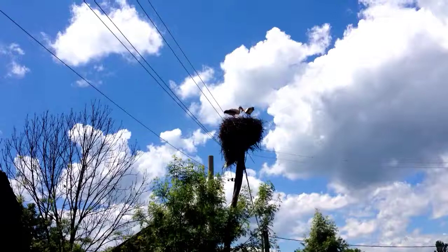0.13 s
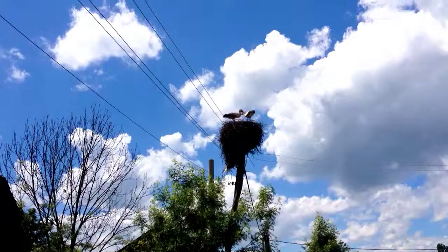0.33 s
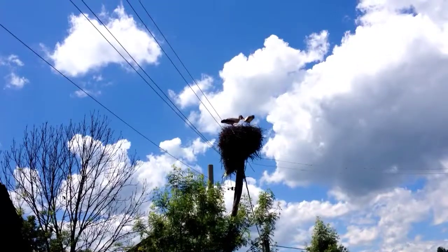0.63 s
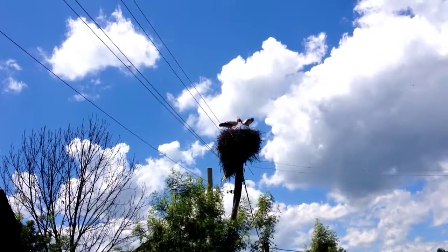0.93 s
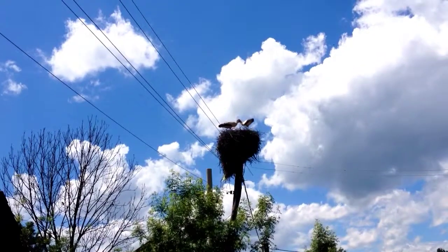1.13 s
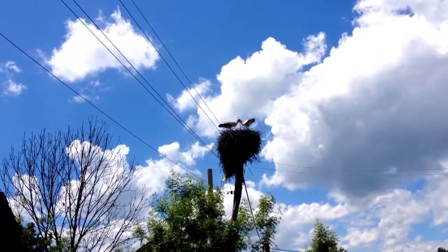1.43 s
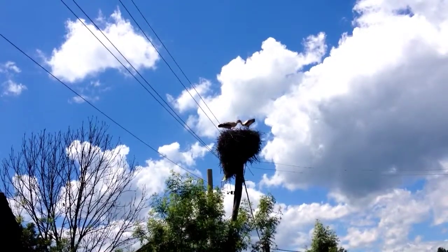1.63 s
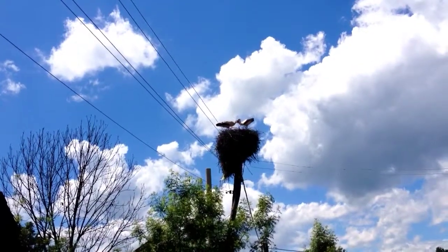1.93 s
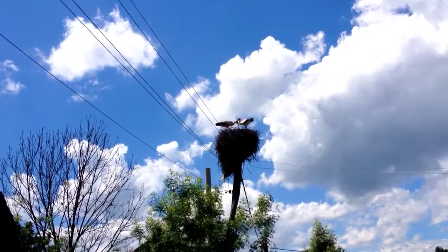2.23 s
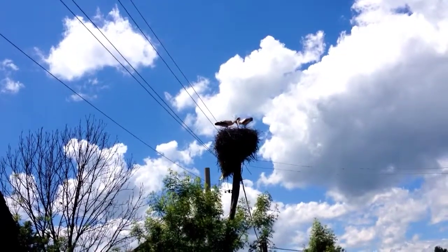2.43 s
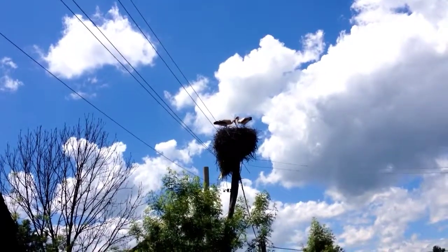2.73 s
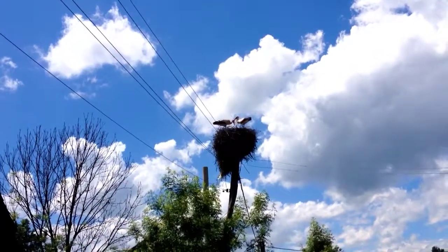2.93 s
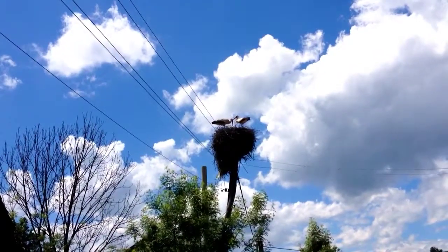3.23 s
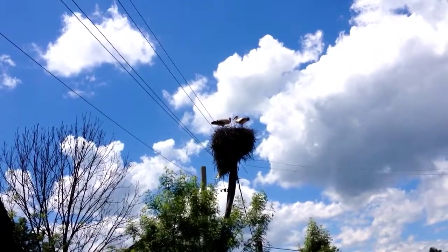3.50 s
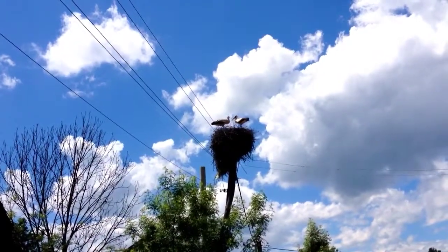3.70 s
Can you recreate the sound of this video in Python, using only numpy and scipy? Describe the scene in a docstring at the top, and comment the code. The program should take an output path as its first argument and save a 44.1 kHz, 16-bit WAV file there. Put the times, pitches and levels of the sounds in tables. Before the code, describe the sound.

Dry, rapid bill clattering from a stork echoes slightly around a yard, then dies away. Small birds keep chirping and whistling faintly in the trees, with a soft steady rush of outdoor air behind them.

```python
"""A stork on its nest is already clattering its bill: a clack's echo opens the sound, over a soft outdoor
rush with sparrows chirping and small birds whistling in the trees. Dry clacks follow from 0.24 s, about
nine a second, with light ticks between the first few. Each is a double impact that excites the modes of
bill and throat pouch. A soft low bump passes at 1.3 s. The roll fades out by 2.5 s, leaving the small
birds and the rush. Stork and small birds reverberate in the yard throughout."""
import sys
import numpy as np
from scipy import signal
from scipy.fft import rfft, irfft, next_fast_len
from scipy.io import wavfile

SR = 44100
rng = np.random.default_rng(int(sys.argv[2]) if len(sys.argv) > 2 else 0)


def inscribe(sig):
    """Save sig as 16-bit PCM at rate SR to the path in sys.argv[1].

    A 1-D sig is mono; a 2-D sig holds one channel per row.
    Samples are clipped to [-1, 1] before scaling.
    """
    pcm = np.round(np.clip(np.atleast_2d(sig).T, -1, 1) * 32767)
    wavfile.write(sys.argv[1], SR, pcm.astype(np.int16))


N = 170226

# Spectrum of the outdoor rush. Each row: frequency in Hz, relative level in dB.
RUSH_SPECTRUM = [(20, -44), (42, -37), (65, -19.5), (100, -8), (180, -4.5), (290, 2), (480, -2),
                 (800, -4.5), (1200, -12.5), (2200, -17), (4500, -17), (5400, -22.5), (7500, -24),
                 (9500, -33), (12000, -29), (15000, -24.5)]
# Loudness contour of the far sparrows. Each row: time in seconds, relative level in dB.
CHATTER_CONTOUR = [(.12, -51), (.3, -52.5), (.45, -53), (.72, -65), (.98, -74), (1.07, -48), (1.22, -81),
                   (1.34, -50), (1.68, -54), (1.9, -60.5), (2.01, -45.5), (2.24, -60.5), (2.35, -52),
                   (2.43, -57.5), (2.5, -79), (2.59, -56), (2.8, -66), (3.17, -54), (3.38, -72),
                   (3.86, -64)]
# Spectra of the far sparrows and of the bump. Each row: frequency in Hz, relative level in dB.
CHATTER_SPECTRUM = [(1800, -38), (2600, -8), (3300, -1), (4700, 6), (5200, -13.5), (7000, -23), (9500, -31)]
BUMP_SPECTRUM = [(40, -25), (100, -3), (190, 0), (330, -22), (800, -2), (1200, -22), (2000, -14),
                 (5000, -22), (12000, -45)]
# Reverberation time of the yard. Each row: frequency in Hz, time to fall 60 dB (T60) in seconds.
YARD_DECAY = [(300, .5), (2000, 0.71), (4500, 0.32), (9000, 0.7)]
# Colour of the reverberation. Each row: frequency in Hz, relative level in dB.
YARD_SPECTRUM = [(300, 5.5), (800, -2.5), (2000, -4.5), (4000, -1), (8000, -0.5), (14000, 1)]
# Sparrow chirps and thin whistles. Each row: start and length in seconds, first, middle and last
# pitch in Hz, relative level in dB.
CHIRP_NOTES = [(.17, 0.043, 6900, 6300, 6070, -60), (.725, .035, 4100, 4000, 3930, -60),
               (1.025, .03, 3740, 4400, 4550, -60), (1.04, .04, 4000, 3700, 3370, -54),
               (1.31, 0.038, 3970, 4470, 5060, -54), (1.345, 0.026, 4180, 4530, 4800, -59),
               (1.515, .03, 4230, 4450, 4650, -66), (1.63, 0.057, 4900, 5240, 4940, -59),
               (1.798, 0.036, 3790, 4300, 4440, -53.5), (1.97, 0.033, 4000, 4790, 4420, -53.5),
               (1.99, 0.063, 4200, 3650, 3110, -56), (2.075, 0.051, 4700, 4600, 4430, -54),
               (2.315, 0.042, 3930, 4510, 4700, -54.5), (2.315, 0.021, 6280, 6730, 7000, -64),
               (2.355, 0.031, 3075, 3350, 3670, -55.5), (2.68, 0.044, 3980, 3550, 3280, -64),
               (2.925, 0.033, 3690, 4450, 4950, -53), (2.945, 0.028, 4010, 4500, 4780, -57),
               (3.095, 0.034, 4080, 4890, 4430, -50.5), (3.115, .045, 4380, 3650, 3390, -55),
               (3.145, 0.042, 3080, 3200, 3240, -56.5), (3.283, .028, 3350, 2800, 2500, -67.5),
               (3.335, 0.051, 4030, 3340, 2670, -58), (3.435, .02, 4470, 4680, 4630, -58),
               (3.565, 0.074, 2290, 3860, 3260, -54), (3.585, .04, 3540, 4150, 3770, -68),
               (3.78, 0.016, 4630, 4750, 4500, -62), (3.83, 0.025, 4300, 4700, 4600, -55.5)]
WHISTLE_NOTES = [(1.44, 0.17, 2290, 2404, 2352, -62), (2.45, 0.049, 5800, 5624, 5640, -49.5),
                 (2.805, 0.17, 2950, 2586, 2534, -65), (3.63, .13, 3520, 3420, 3300, -61.5),
                 (3.77, 0.13, 3080, 3120, 3230, -64)]
# Spectra of the bill's two contacts and the nest's scatter. Each row: frequency in Hz, relative dB.
FIRST_CONTACT = [(150, -26), (700, -0.5), (1200, -5), (1900, -13), (2700, -1), (4500, 0), (5300, -7),
                 (7400, -7), (8400, -10), (9400, -19.5), (11500, -29), (14500, -32)]
SECOND_CONTACT = [(150, -21.5), (700, 1), (1200, -9), (1900, 4), (2700, 0), (3700, -3), (4700, -15.5),
                  (5400, -19.5), (7400, -6.5), (9200, -21.5), (14000, -30.5)]
NEST_SPECTRUM = [(150, -21.5), (450, -6.5), (700, 4.5), (1130, -21.5), (1600, -3), (2800, 4), (4600, -6),
                 (5300, -16.5), (7800, -9.5), (9300, -23), (14000, -31)]
# Modes of the bill. Each row: frequency in Hz, relative level in dB, T60 in seconds.
BILL_MODES = [(1379, -6.5, 0.06), (1576, -5.5, 0.14), (1787, -6, 0.065), (1902, 4, 0.063),
              (2065, -23.5, 0.019), (2574, -4, 0.039), (2773, -4, 0.041), (2900, -4.5, 0.073),
              (3130, -30, .04), (3678, 4.5, 0.055), (4410, 16, 0.01), (4640, 5, 0.049)]
# Modes of the throat pouch. Each row: multiple of its pitch, relative level in dB, T60 in seconds.
POUCH_MODES = [(.885, -4, .055), (1.045, 0, 0.059)]
# Swell of the bill's main ring. Each row: time in seconds, gain in dB.
RING_CONTOUR = [(.24, -5.5), (.7, 0.5), (1.05, -5), (1.3, 2), (1.7, 2.5), (2.0, 1), (2.3, -5)]
# Light ticks of the bill. Each row: start in seconds, level in dB.
BILL_TICKS = [(0.2157, -25), (0.3758, -26), (0.5319, -24.5), (0.6923, -30.5), (.8487, -25.5), (1.0017, -28)]
# The roll. Each row: start in seconds, level, pouch gain and brightness in dB, pouch pitch in Hz.
BILL_CLACKS = [(0.2373, -12, -13, -0.5, 770), (0.3441, -12, -1, 4, 762), (0.4524, -11.5, 1.5, 3, 755),
               (0.5612, -12, 1.6, 1, 747), (0.6627, -12.5, -0.8, 1, 759), (0.7637, -13.5, 0.5, 1.5, 720),
               (0.8667, -15, 3, -2.3, 680), (0.9615, -15.5, 4.5, -1.5, 720), (1.0593, -16.3, 3, -0.5, 763),
               (1.1616, -11.5, -6, -0.5, 746), (1.2745, -10.5, -1.1, 0, 703), (1.3873, -11, 0.5, -0.2, 697),
               (1.499, -11.5, -3, -0.3, 747), (1.6084, -12, -9, 0, 710), (1.7184, -11, -10, -3.5, 700),
               (1.8249, -13, 2, -1, 690), (1.9278, -14.5, -1, 2, 672), (2.0334, -15, 1, 2.1, 700),
               (2.1338, -17.3, 3.5, 3.5, 744), (2.2355, -21.5, 6, 1, 704), (2.3364, -25, 9, 2, 708),
               (2.439, -33, 13, -1, 736)]

OPENING_S = 0.12
CHIRP_FLUTTER, WHISTLE_FLUTTER = 0.025, 0.0017  # relative pitch deviation of a 37 ms note


def amp(db):
    """Amplitude grows tenfold with every 20 dB."""
    return 10 ** (np.asarray(db) / 20)


def unit_energy(x):
    """Energy, the sum of squares, is normalised to 1."""
    return x / np.sqrt(np.sum(x ** 2) + 1e-20)


def unit_rms(x):
    """Power, the mean square, is normalised to 1."""
    return unit_energy(x) * np.sqrt(len(x))


def at_frequency(curve, hz):
    """A curve is interpolated on a logarithmic frequency axis."""
    known_hz, values = np.transpose(curve)
    return np.interp(np.log(hz + 1), np.log(known_hz), values)


def at_each_sample(contour):
    """A contour is interpolated linearly in time."""
    return np.interp(np.arange(N) / SR, *np.transpose(contour))


def add(mix, start_s, sound):
    """Superposition: a sound adds to the mix from its start time on."""
    part = mix[max(round(start_s * SR), 0):][:len(sound)]
    part += sound[:len(part)]


def wander(size, cutoff_hz):
    """Low-passed noise gives a smooth random motion of rms about 1."""
    padded = 2 * next_fast_len(size // 2 + 1)
    hz = np.fft.rfftfreq(padded, 1 / SR)
    return unit_rms(irfft(rfft(rng.standard_normal(padded)) / (1 + (hz / cutoff_hz) ** 4)))[:size]


def noise(spectrum):
    """Spectral shaping turns white noise into steady coloured noise of rms 1."""
    gain = amp(at_frequency(spectrum, np.fft.rfftfreq(N, 1 / SR)))
    return unit_rms(irfft(rfft(rng.standard_normal(N)) * gain, N))


def outdoor_rush():
    """Slight random amplitude modulation makes broadband noise waver."""
    return noise(RUSH_SPECTRUM) * amp(-57 + 1.12 * wander(N, cutoff_hz=7.6))


def far_sparrows():
    """Many distant calls sum incoherently to a band of noise whose level flickers."""
    level_db = at_each_sample(CHATTER_CONTOUR) - 7.5
    return noise(CHATTER_SPECTRUM) * amp(level_db + 3.2 * wander(N, cutoff_hz=23))


def yard_reverb(source, crossfade_s=0.1097, echoes_per_s=2500, grain_db=4.5):
    """Reflections from houses and trees decay exponentially; four sets of paths crossfade in turn."""
    out, turn = np.zeros(N), np.arange(N) / SR / crossfade_s
    for k in range(4):
        echoes = rng.standard_normal(SR) * amp(grain_db * rng.standard_normal(SR))
        echoes *= rng.random(SR) < echoes_per_s / SR
        hz, t, bands = signal.stft(echoes, SR, nperseg=256)
        colour_db = at_frequency(YARD_SPECTRUM, hz)[:, None]
        decay_db = 60 * t / at_frequency(YARD_DECAY, hz)[:, None]
        build_up = np.minimum(t / 0.023, 1)
        _, response = signal.istft(bands * amp(colour_db - decay_db) * build_up, SR, nperseg=256)
        share = np.sqrt(np.maximum(1 - abs((turn + k) % 4 - 2), 0))
        out += signal.fftconvolve(source * share, unit_energy(response))[:N]
    return out


def low_bump(start_s=1.331, attack_s=0.002, t60=0.24):
    """Dull noise with a fast attack and exponential decay is heard as one bump."""
    t = np.maximum(np.arange(N) / SR - start_s, 0)
    return noise(BUMP_SPECTRUM) * np.minimum(t / attack_s, 1) * amp(-53 - 60 * t / t60)


def bird_notes(notes, flutter_depth):
    """Frequency modulation: each tone glides along a parabola, and longer notes flutter more."""
    out, flutter = np.zeros(N), wander(N + SR, cutoff_hz=450)
    for start_s, length_s, *pitches_hz, level_db in notes:
        progress = np.linspace(0, 1, int(length_s * SR))
        glide_hz = np.polyval(np.polyfit([0, .5, 1], pitches_hz, 2), progress)
        deviation = flutter_depth * length_s / 0.037 * flutter[int(start_s * SR):][:len(progress)]
        phase = 2 * np.pi * np.cumsum(glide_hz * (1 + deviation)) / SR
        tone = np.sin(phase) + amp(-28.5) * np.sin(2 * phase)
        envelope = np.sqrt(progress * (1 - progress))
        add(out, start_s, amp(level_db) * unit_rms(envelope * tone))
    return out


def far_twitter(notes_per_s=14, low_hz=2887, high_hz=4680, glide=0.16):
    """Farther birds call as a random process: faint short glides, independent in time and pitch."""
    notes = []
    for when, length, pitch, first, last, faintness in rng.random((int(notes_per_s * N / SR), 6)):
        hz = low_hz + pitch * (high_hz - low_hz)
        first_hz = hz * (1 + glide * (.5 - 2 * first))
        last_hz = hz * (1 + glide * (.5 - 2 * last))
        notes.append((when * N / SR, 0.0203 + 0.029 * length, first_hz, hz, last_hz, -63.5 - 5 * faintness))
    return bird_notes(notes, CHIRP_FLUTTER)


def small_birds(foliage_t60=0.083, wall_delay_s=0.022):
    """Scattering in the foliage blurs the song, and reflection from a wall adds one echo."""
    song = bird_notes(CHIRP_NOTES, CHIRP_FLUTTER) + bird_notes(WHISTLE_NOTES, WHISTLE_FLUTTER)
    song += far_twitter()
    t = np.arange(SR // 4) / SR
    reflections = amp(-3.5) * unit_energy(rng.standard_normal(len(t)) * amp(-60 * t / foliage_t60))
    add(reflections, wall_delay_s, amp([-14]))
    return amp(-3) * (song + signal.fftconvolve(song, reflections)[:N])


def impact(spectrum, bright_db):
    """A minimum-phase pulse packs its energy at the onset; brightness tilts its treble."""
    hz = np.fft.rfftfreq(2048, 1 / SR)
    gain = amp(at_frequency(spectrum, hz))
    treble_shelf = amp(bright_db * at_frequency([(2500, 0.086), (5000, 0.94)], hz))
    gain = gain / np.linalg.norm(irfft(gain)) * treble_shelf
    log_gain = np.log(np.r_[gain, gain[-2:0:-1]])
    return np.fft.ifft(np.exp(np.conj(signal.hilbert(log_gain)))).real


def modal_ring(modes, t, tuning=1, detune_spread=0.0049, strike_spread_db=3.5):
    """Damped modes ring freely, slightly detuned; each blow hits a new spot and weights them anew."""
    out = np.zeros(len(t))
    for (frequency, db, t60), (detune, strike) in zip(modes, rng.standard_normal((len(modes), 2))):
        hz = frequency * tuning * (1 + detune_spread * detune)
        out += amp(db + strike_spread_db * strike - 60 * t / t60) * np.sin(2 * np.pi * hz * t)
    return unit_energy(out)


def nest_scatter(start_s, t, bright_db, twig_paths, pose_s=0.36, t60=0.044):
    """Scattering from the nest gives a short tail whose paths change as the head moves."""
    pose_weights = np.exp(-(np.arange(len(twig_paths)) - start_s / pose_s) ** 2)
    response = (pose_weights @ twig_paths) * amp(-60 * t / t60)
    return unit_energy(signal.fftconvolve(response, impact(NEST_SPECTRUM, bright_db)))


def clack(twig_paths, start_s, level_db, pouch_db=0, bright_db=0, pouch_hz=770):
    """Impulse excitation: the first contact rings the throat pouch, the second rings the bill."""
    t = np.arange(twig_paths.shape[1]) / SR
    out = np.zeros(len(t))
    gap_s = 0.001341 * (1 + .05 * rng.standard_normal())
    second_contact = impact(SECOND_CONTACT, bright_db)
    add(out, 0, amp(-3.5) * impact(FIRST_CONTACT, bright_db))
    add(out, gap_s, amp(-4.5) * second_contact)
    add(out, gap_s + .0052, amp(-15.5) * second_contact)  # a near reflection
    add(out, gap_s, amp(-8.5) * modal_ring(BILL_MODES, t))
    add(out, 0, amp(pouch_db - 7.5) * modal_ring(POUCH_MODES, t, tuning=pouch_hz))
    add(out, gap_s, amp(-2.5) * nest_scatter(start_s, t, bright_db, twig_paths))
    return amp(level_db) * out


def stork(ring_hz=2700, ring_width_hz=220, low_cut_hz=86):
    """A train of impacts forms the roll; the bill's main resonance swells in mid-roll."""
    roll, twig_paths = np.zeros(N), rng.standard_normal((8, 4096))
    early_clack = (.04, -8)  # falls before the opening, so only its reverberation is heard
    for row in BILL_CLACKS + BILL_TICKS + [early_clack]:
        add(roll, row[0], clack(twig_paths, *row))
    main_ring = signal.lfilter(*signal.iirpeak(ring_hz, ring_hz / ring_width_hz, SR), roll)
    roll += (amp(at_each_sample(RING_CONTOUR)) - 1) * main_ring
    return signal.sosfilt(signal.butter(2, low_cut_hz, "high", fs=SR, output="sos"), roll)


def scene():
    """Direct sound and the reverberation of stork and small birds superpose in one channel."""
    bill, birds = stork(), small_birds()
    direct = bill + birds + low_bump() + far_sparrows() + outdoor_rush()
    return (direct + yard_reverb(amp(-9) * bill + amp(-5) * birds))[None]


def record(dry):
    """A short ramp opens the sound after silence; a low-pass filter limits the band to 15.5 kHz."""
    fade_in = np.clip((np.arange(N) / SR - OPENING_S) / 0.0043, 0, 1)
    low_pass = signal.firwin(401, 15500, window=("kaiser", 7), fs=SR)
    return signal.oaconvolve(dry * fade_in, low_pass[None], "same")


dry = scene()
out = record(dry)
inscribe(out)
```